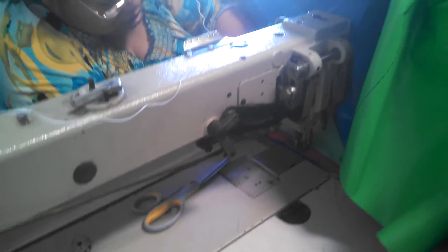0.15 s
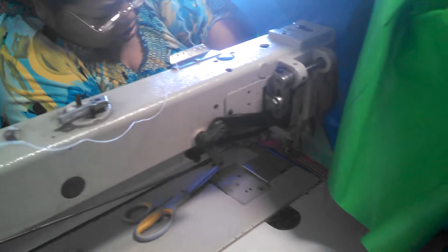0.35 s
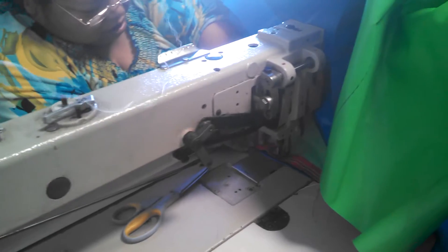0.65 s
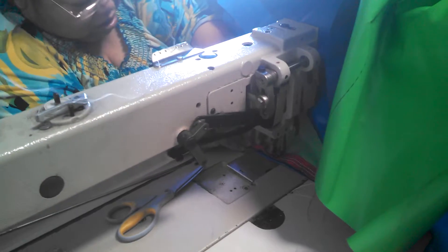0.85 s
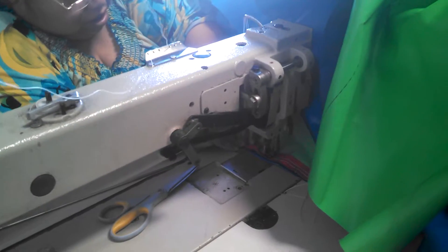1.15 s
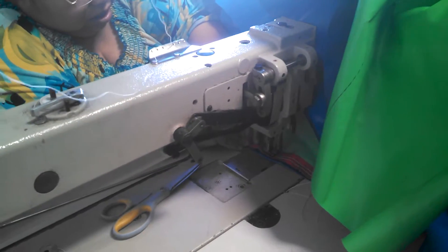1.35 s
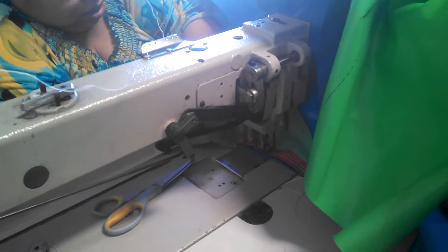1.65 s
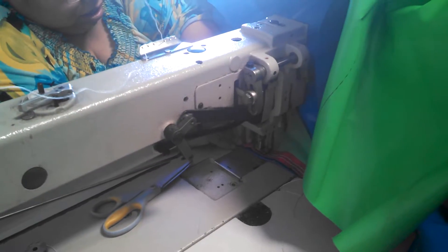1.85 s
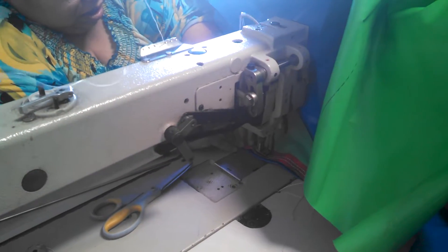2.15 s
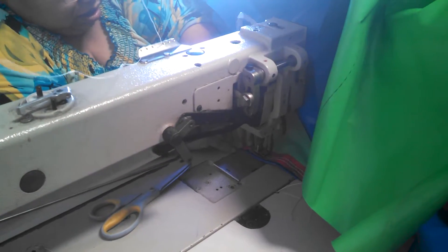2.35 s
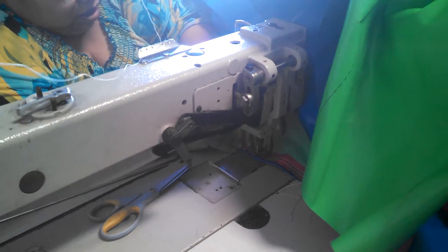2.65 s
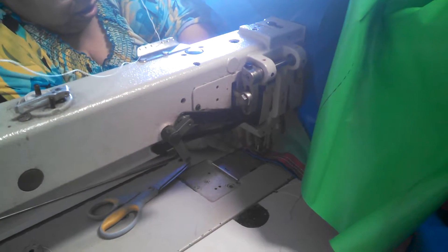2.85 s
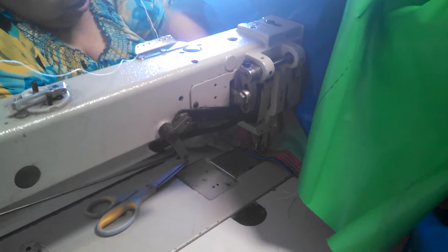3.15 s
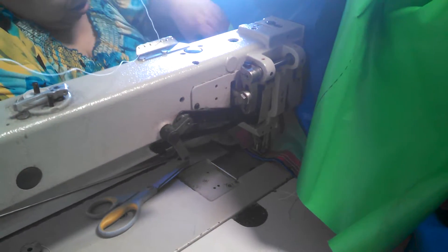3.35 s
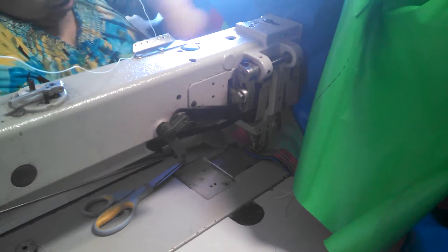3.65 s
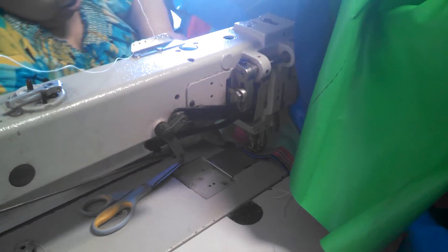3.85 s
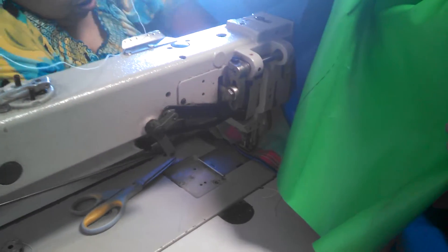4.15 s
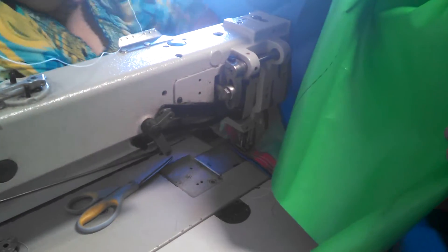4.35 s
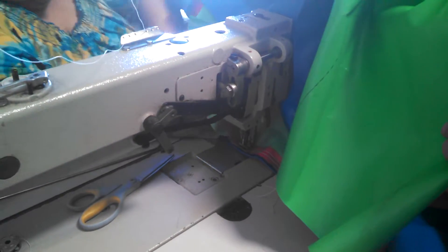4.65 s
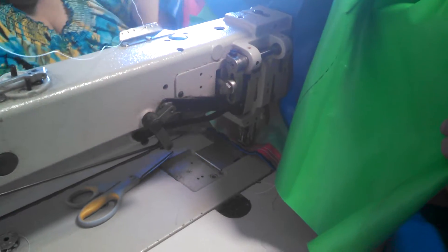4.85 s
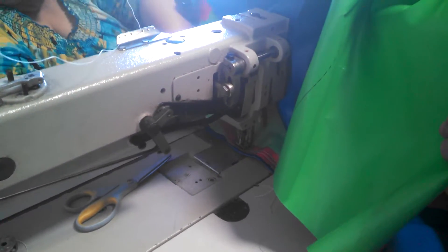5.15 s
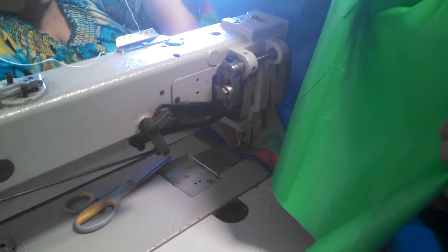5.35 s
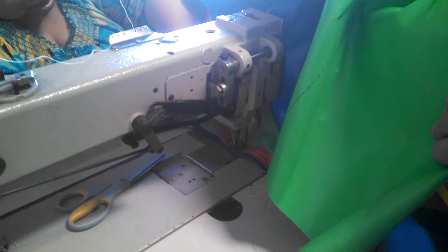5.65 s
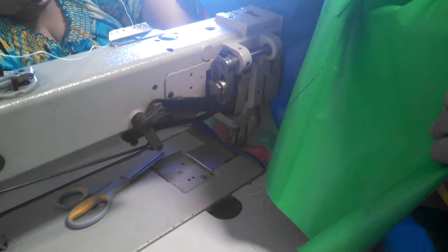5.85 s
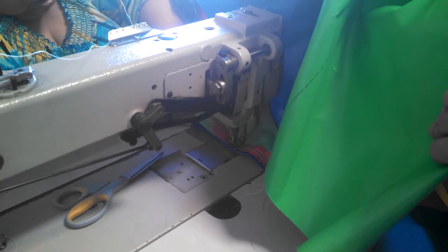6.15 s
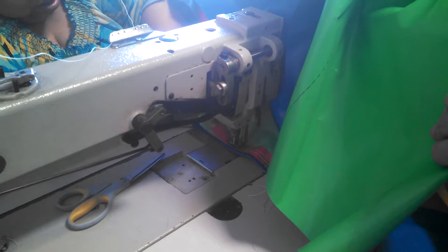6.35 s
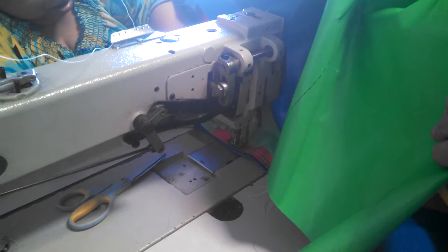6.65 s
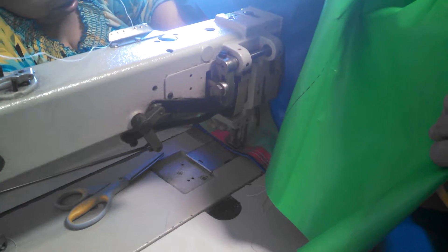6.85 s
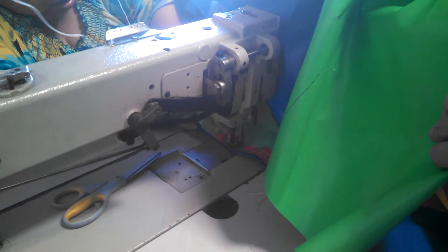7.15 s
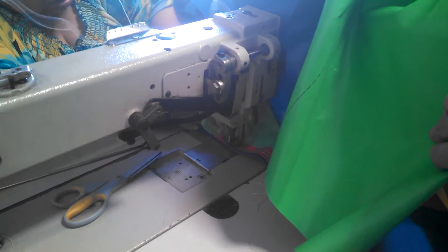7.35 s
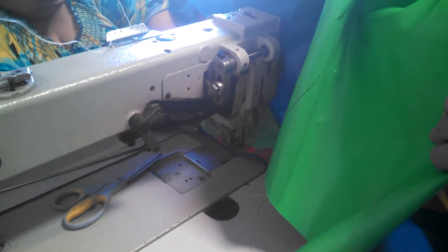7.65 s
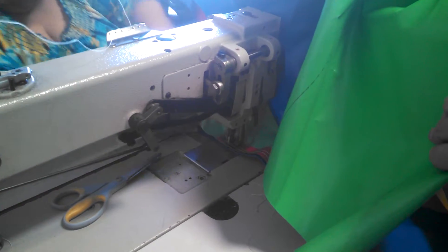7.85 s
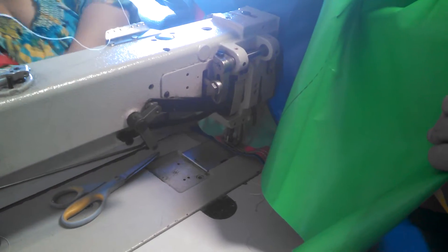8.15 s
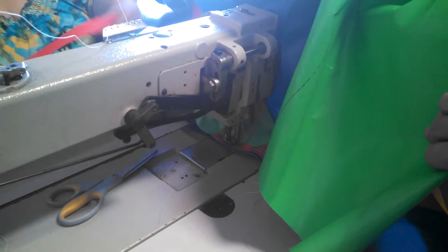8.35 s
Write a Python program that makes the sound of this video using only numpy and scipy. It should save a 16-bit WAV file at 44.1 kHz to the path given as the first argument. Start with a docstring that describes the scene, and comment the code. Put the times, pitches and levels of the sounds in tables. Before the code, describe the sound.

Close stereo sound in a workshop with a short room echo. A mid-pitched motor whine near 520 Hz, with an overtone, sits over low mains hum, airy room wash and a faint, very high whistle. From 0.4 to 0.7 s a heavy sewing machine clatters hard: rapid metal ticks, loose rattling and low table shudder. Shorter bursts follow around 0.8-1.0, 1.25, 1.6-1.8, 2.0, 2.4 and 2.8 s, with small pings. The whine is stronger from about 3 s as stiff vinyl scrapes and crumples; a heavy knock lands at 3.7 s, then dense thumps and rustling from 4.0 to 4.7 s. Sparser crackles and taps fade through 6.5 s, with a crease snap at 6.2. At 6.86-7.15 s a loud burst shakes the table while the whine drops steeply; another comes at 7.3-7.5 s. A light knock at 7.86 s and faint rustle follow as the whine climbs back by 8.5 s.

```python
"""A heavy sewing machine clatters in short bursts: noise strikes, rattle, a ringing head, a shuddering table.
Between bursts stiff vinyl is dragged (filtered grains of noise) and knocked on the table (damped sines).
Behind lie motor whine, mains hum, a thin whistle (sines) and room wash (noise); their level follows a
set curve, falling steeply in the late burst and climbing back. Two spaced ports, the right late and inverted."""
import sys
import numpy as np
from scipy import signal
from scipy.fft import rfft, irfft, next_fast_len
from scipy.io import wavfile
from scipy.ndimage import uniform_filter1d

SR = 44100
rng = np.random.default_rng(int(sys.argv[2]) if len(sys.argv) > 2 else 0)


def master(y):
    """Save y as 16-bit WAV."""
    cut = np.clip(np.atleast_2d(y).T, -1, 1)
    pcm = np.round(cut * 32767)  # scale
    wavfile.write(sys.argv[1], SR, pcm.astype(np.int16))


N = 375291

# Reference level of the steady shop sounds: (time [s], level [dB])
STEADY_LEVEL = [(0, -47.5), (.4, -48), (.75, -50.5), (1.25, -47.5), (1.95, -40), (2.15, -45), (2.95, -36),
                (4.2, -37), (6.86, -36), (6.96, -49), (7.3, -53.5), (7.6, -48.5), (8.5, -39.5)]
# Motor whine partials: (multiple of pitch, level re steady [dB], left above right [dB], left lead [rad])
WHINE_PARTIALS = [(1, -0.5, -0.5, 0.64), (2, -4.5, -3, -0.12), (3, -19, -3.5, 0.67), (4, -39, 0, -2.5),
                  (5, -36, 0, 2), (6, -32, -2, 5.5), (8, -42, -3, 2), (19.283, -33, 0, -7)]
WHINE_HZ = 522.9
MAINS_HZ, MAINS_LEFT_DB, MAINS_RIGHT_DB = 120.3, -1, -8
# Faint hums beside the mains: (frequency [Hz], level re steady [dB])
FAINT_HUMS = [(206, -28), (239.8, -25), (360.3, -22.5), (440, -18.5), (596, -24), (1121, -23)]
# Thin high tone: (time [s], centre frequency [Hz])
WHISTLE_PITCH = [(0, 13495), (1.2, 13505), (2.3, 13528), (2.9, 13517), (3.7, 13530), (3.9, 13548),
                 (4.9, 13512), (5.9, 13540), (6.8, 13568), (7.6, 13560), (8.5, 13538)]
# Room wash spectrum: (frequency [Hz], relative density [dB])
WASH_SPECTRUM = [(30, -13), (70, 1), (150, 3), (400, 3.5), (900, -2), (1800, -8), (2800, -8), (4500, -13.5),
                 (9000, -21), (13300, -24.5), (13900, -61)]
WASH_DB = -7.5  # re steady level
LINGER_DB, LINGER_DB_PER_S = -14, 49  # shop murmur after a burst, re table rumble

# Vinyl dragged over the table: (time [s], hiss level [dB], crumpling level [dB])
VINYL_DRAG = [(2.96, -45, -49), (2.99, -44.5, -39.5), (3.27, -44, -45), (3.35, -42.5, -39.5),
              (3.4, -49, -45), (3.51, -47.5, -44.5), (3.65, -52, -46.5), (3.74, -33, -29.5),
              (3.84, -48, -40.5), (4.02, -40, -35.5), (4.12, -43.5, -32.5), (4.22, -42, -31),
              (4.3, -40, -31.5), (4.35, -42.5, -30.5), (4.39, -51, -39), (4.5, -41.5, -34.5),
              (4.56, -39.5, -34), (4.6, -32.5, -27), (4.64, -42, -35), (4.72, -36.5, -34.5),
              (4.85, -49, -39.5), (4.93, -46.5, -48), (5, -49, -46), (5.06, -46, -43), (5.17, -47.5, -40.5),
              (5.25, -59, -44), (5.42, -45, -43.5), (5.51, -55, -44), (5.57, -44, -42), (5.63, -55, -45),
              (5.7, -55, -36), (5.76, -63, -44), (5.8, -50, -41), (5.98, -69, -48), (6.07, -47, -45),
              (6.12, -58, -49), (6.38, -49, -52), (6.46, -68, -42), (6.51, -52, -39), (6.58, -64, -49),
              (6.73, -49, -51), (6.86, -67, -65), (7.0, -80, -80), (7.7, -60, -50), (7.9, -57.5, -53),
              (8.18, -58.5, -86), (8.3, -47, -50), (8.5, -54, -53)]
# Crumpling spectrum: (frequency [Hz], relative density [dB])
CRUMPLE_SPECTRUM = [(120, -4.5), (250, 4.5), (450, 8), (800, 2), (1300, -3.5), (2500, -50)]
# Stick-slip hiss spectrum: (frequency [Hz], relative density [dB])
SLIDE_SPECTRUM = [(900, -17), (2000, 8), (3200, 3), (4300, 5), (5800, 2), (8000, -1.5), (13100, -6),
                  (13900, -70)]
# Vinyl creases snapping: (time [s], nominal level [dB], note frequency [Hz])
CREASE_SNAPS = [(3.1469, -27, 4440), (3.2277, -29, 4100), (3.342, -28, 4440), (3.7031, -21, 4400),
                (3.7525, -30, 3940), (3.9032, -25, 4200), (4.5322, -28, 3870), (4.65, -28, 4050),
                (4.6902, -25, 4100), (4.8231, -32, 3810), (5.4048, -33, 4430), (5.5638, -36, 3950),
                (5.7894, -32, 4270), (6.0694, -46, 4250), (6.2066, -22.5, 3860)]
SNAP_RISE_S, SNAP_T60_S, SNAP_HISS_DB, SNAP_NOTE_DB = 0.0035, 0.044, -14, -14.5

# Thin parts left ringing: (time [s], level [dB], frequency [Hz], t60 [s])
PINGS = [(0.876, -31, 3850, 0.037), (1.02, -31, 2680, 0.15), (1.225, -41, 12500, 0.11),
         (1.255, -18, 7820, 0.017), (1.617, -17, 7800, 0.019), (2.023, -18, 7850, 0.026),
         (.512, -21, 1770, 0.045), (2.784, -25, 1980, .04), (2.965, -23.5, 1910, 0.035),
         (2.98, -27, 2100, .025), (6.401, -38, 4480, 0.088), (6.403, -28, 5400, 0.061),
         (1.279, -27, 4600, 0.022), (6.89, -32, 6900, 0.023), (7.3, -27, 7650, 0.026),
         (7.39, -27, 7500, 0.027), (7.416, -25, 7800, .03), (7.437, -39, 9560, 0.089),
         (7.463, -31, 3800, .04), (2.268, -45, 6700, 0.032), (7.51, -30, 2600, 0.06)]
# Blows on the table: (time [s], nominal level [dB], pitch [Hz], rise [swings], t60 [s])
TABLE_BLOWS = [(0.425, -14, 220, .8, .015), (.468, -17, 590, 1.5, 0.029), (.487, -16, 590, 1.2, 0.03),
               (.511, -17, 770, 1.4, 0.033), (.521, -17, 320, 1, 0.018), (.556, -21, 766, 1.5, .02),
               (.577, -18, 674, 1.5, .02), (.855, -27, 616, 1.2, .025), (.952, -21.5, 630, 1.6, 0.028),
               (.978, -23, 304, 1.2, 0.023), (1.002, -20, 703, 1.6, 0.023), (1.026, -21, 517, 1.4, .025),
               (1.266, -7, 350, 0.72, 0.0084), (1.602, -24, 595, 2.2, 0.036), (1.621, -25, 1150, 2.4, 0.03),
               (1.645, -17.5, 242, 1.3, 0.038), (1.704, -22, 483, 1.7, 0.027),
               (1.772, -19.5, 785, 1.1, 0.018), (1.971, -22, 530, 1.5, 0.019),
               (2.045, -18, 250, 1.2, 0.033), (2.105, -24, 525, 1.3, 0.025), (2.022, -11, 634, 0.8, 0.01),
               (2.374, -20.5, 605, 1, 0.036), (2.414, -21.5, 743, 1.5, 0.027),
               (2.784, -24, 1150, 2.2, 0.023), (2.806, -23, 1140, 2, .025), (2.966, -14.5, 555, 2.2, 0.019),
               (3.707, -2, 660, 2.1, 0.014), (3.977, -36, 500, 1.7, 0.015), (4.017, -19, 474, 1.2, 0.027),
               (4.188, -17, 406, 1.6, 0.027), (4.208, -17, 640, 1.6, 0.022), (4.236, -16, 486, 2, 0.037),
               (4.279, -16, 870, 0.54, 0.026), (4.304, -20, 783, 1.7, 0.041), (4.323, -14, 590, 1.5, 0.016),
               (4.346, -7.5, 590, 0.78, 0.015), (4.391, -18.5, 800, 1.3, 0.027),
               (4.534, -12.5, 660, 2, 0.023), (4.584, -12, 625, 1.1, 0.018), (4.616, -31, 570, 1.8, 0.027),
               (4.719, -27, 660, 1.6, .02), (5.05, -19.5, 388, 1.5, 0.021), (5.274, -18.5, 705, 1.6, 0.019),
               (5.69, -19, 700, 1.8, 0.02), (5.789, -29, 594, 1.2, 0.026), (5.843, -20, 695, 0.87, 0.0098),
               (6.203, -21.5, 720, 1.5, 0.019), (6.499, -26, 680, 1.1, 0.015), (6.87, -16.5, 272, 1.2, .03),
               (6.904, -3, 400, 0.87, 0.012), (6.929, -12, 706, .6, 0.017), (6.984, -32, 845, 0.95, 0.016),
               (7.03, -31, 910, 1.2, 0.017), (7.087, -22, 781, 1.5, .025), (7.297, -30, 780, 1.9, 0.046),
               (7.333, -25, 310, 1.2, 0.024), (7.414, -23, 720, 1.6, 0.028), (7.445, -15, 308, 1.2, 0.023),
               (7.466, -11, 325, 1.3, 0.03), (7.492, -25, 782, 1.4, 0.065), (7.859, -21.5, 660, 1.8, 0.012)]

# Pedal pushes: (start [s], rise [s], hold [s], table rumble [dB], rattle of loose parts [dB])
PEDAL_BURSTS = [(0.379, 0.077, 0.14, -28.5, -36), (0.777, 0.095, 0.012, -35.5, -42),
                (0.935, 0.022, 0.028, -35.5, -45), (1.224, 0.05, 0.016, -30.5, -43),
                (1.559, 0.069, 0.025, -30.5, -41.5), (1.69, 0.14, .01, -49, -51.5),
                (1.952, 0.065, 0.018, -29.5, -39.5), (2.156, 0.033, 0.0092, -44.5, -74),
                (2.357, 0.032, 0.051, -34, -64), (2.763, 0.027, 0.18, -36.5, -66),
                (6.858, 0.032, 0.17, -27, -32), (7.276, 0.069, 0.017, -36, -38.5),
                (7.393, 0.043, 0.0081, -29, -49)]
START_S, RISE_DB = 0.014, 10.5  # onset ramp; a burst starts this far under its top
RUMBLE_FALL_DB_PER_S, RATTLE_FALL_DB_PER_S = 139, 127
# Table shudder spectrum: (frequency [Hz], relative density [dB])
SHUDDER_SPECTRUM = [(100, -10), (170, 3), (250, 5), (500, 2.5), (750, -0.5), (1250, -7.5), (2200, -21.5),
                    (4000, -28.5)]
# Jolts that set the table swaying: (time [s], level [dB])
TABLE_JOLTS = [(.41, -28.5), (.475, -36), (.635, -47), (.8, -39), (.87, -42), (.965, -30), (1.26, -27),
               (1.62, -28), (1.76, -62), (2.015, -28), (2.21, -53), (2.39, -31.5), (2.79, -42), (2.85, -38),
               (2.98, -52), (6.89, -22.5), (7.03, -37), (7.1, -48), (7.22, -53), (7.315, -34),
               (7.435, -23.5)]
JOLT_RISE_S, JOLT_T60_S, JOLT_TAIL_DB, JOLT_TAIL_T60_S = 0.011, 0.27, -10.5, 1
STILL_S, STILL_DB_PER_S = 7.485, 200  # the brake damps the swaying after the last burst
SWAY_HZ = 89.9
# Noise of the swaying: (frequency [Hz], relative density [dB])
SWAY_SPECTRUM = [(40, 9), (60, -2.5), (90, 17), (130, -1), (200, -41)]

# Metal strikes: (time [s], nominal level [dB], head ring re strike [dB], brightness re strike [dB], t60 [s])
METAL_STRIKES = [(0.396, -30.5, 8, -22, 0.15), (0.444, -27, -1, -10, 0.095), (0.4628, -14.5, -3, -18, 0.09),
                 (.478, -21, -1, -9, .06), (0.488, -28, 8, -7, .05), (0.5012, -23, 3, -9, .06),
                 (0.5128, -15.5, -1, -12.5, 0.057), (0.522, -21, -7, -11, 0.045),
                 (0.543, -21.5, -20, -15, 0.21), (0.568, -24.5, -26, -10, 0.12),
                 (0.608, -15, -7, -18, 0.044), (0.622, -27, -12, -6, 0.038), (.641, -32, -12, -10, .07),
                 (.667, -32, -6, -18, 0.042), (.69, -36, 7, -23, 0.044), (.797, -42, 10, -26, 0.065),
                 (0.816, -27, -9, -17, 0.039), (0.853, -12.5, -16, -13.5, 0.029),
                 (.8754, -33, -16, -14, 0.053), (.902, -25.5, -19, -12, .04), (.918, -29, -18, -12, .04),
                 (.931, -25, -20, -17, 0.044), (.949, -21, -4, -13, 0.064), (.9944, -29.5, -8, -23, 0.12),
                 (1.042, -45, 15.5, -26, .07), (1.253, -23.5, -25, -11.5, 0.039),
                 (1.277, -27.5, -27, -31, 0.08), (1.342, -28.5, -3, -15.5, 0.049),
                 (1.359, -42, -10, -16, 0.041), (1.398, -35.5, -13, -12, 0.053), (1.562, -35, 5, -18, .08),
                 (1.5713, -29.5, 3, -12.5, 0.091), (1.6146, -21.5, -1, -12, 0.037),
                 (1.64, -24, -26, -13, 0.078), (1.695, -29.5, 7, -11, 0.064),
                 (1.7447, -26.5, -26, -12, 0.038), (1.772, -27, 1, -19, 0.026),
                 (1.783, -41, -15, -8, 0.022), (1.966, -23, 0, -22, .06), (1.973, -25, 0, -16, 0.078),
                 (2.02, -18, 2, -11, 0.046), (2.046, -23.5, -25, -17, 0.057), (2.096, -32, 7.5, -9, 0.073),
                 (2.143, -27.5, -22, -13.5, 0.083), (2.203, -28, 0, -17, 0.032),
                 (2.364, -27.5, -2, -20, 0.16), (2.3886, -31, -1, -19, 0.077),
                 (2.4148, -26, 4.5, -11, 0.097), (2.445, -23, -7, -24, 0.029), (2.783, -29, 6, -14, 0.088),
                 (2.803, -25, -9, -27, 0.061), (2.835, -26, 1.5, -13.5, 0.16), (2.867, -30, 5, -20, .07),
                 (2.963, -24.5, -9, -8.5, 0.12), (3.1918, -39, 14.5, -18, 0.076), (4.342, -32, 9, -31, .06),
                 (6.399, -26, -27, -6, 0.03), (6.8665, -27, -9, -30, 0.057), (6.889, -18.5, -23, -14, 0.06),
                 (6.915, -14, -3, -13, 0.039), (6.927, -18, -12, -20, .05), (6.939, -11.5, -26, -13, 0.047),
                 (6.966, -20, -18, -10, 0.079), (6.981, -16.5, 3, -16, 0.063), (6.992, -21, -16, -10, 0.15),
                 (7.029, -23, 2, -14, 0.054), (7.04, -18, -3, -15, 0.061), (7.066, -28, -4, -7, .06),
                 (7.085, -14.5, 0, -17, .05), (7.098, -24, -8, -7, 0.038), (7.124, -40, -12, -5, 0.052),
                 (7.148, -39, -8, -16, 0.053), (7.183, -33.5, 2, -12, 0.059), (7.297, -28.5, -2, -11, 0.04),
                 (7.3236, -30, -13, -12, 0.065), (7.3577, -29, -14, -13, 0.066),
                 (7.3866, -20.5, -7, -12, 0.041), (7.413, -20, 1.5, -15, 0.039),
                 (7.4335, -24, -17, -15, 0.097), (7.46, -25, -16, -22, 0.064),
                 (7.487, -29.5, 9, -12, 0.042)]
STRIKE_RISE_S, BRIGHT_T60_S, CLINK_DB, CLINK_T60_S = 0.0039, 0.36, -7, 0.019
# Rattle of loose steel: (frequency [Hz], relative density [dB])
RATTLE_SPECTRUM = [(1500, -8), (3000, 0.5), (4200, -7.5), (6500, -10), (10000, -9), (14800, -25),
                   (15600, -55)]
# Machine head modes: (frequency [Hz], t60 [s], relative level [dB])
HEAD_MODES = [(1230, .02, -2), (1420, .018, -4), (1570, .02, -4), (1800, .03, -2), (2010, .022, -2),
              (2300, .018, -3), (2480, .018, -2), (2650, .018, -2), (3050, .018, -3)]
# Small-part resonances: (frequency [Hz], width [Hz], gain [dB])
PART_PEAKS = [(3550, 30, -19), (3900, 91, 3.5), (4280, 220, 2.5), (5150, 2050, 9), (8060, 470, 8),
              (10540, 220, 6)]
# Lower half of a tick: (frequency [Hz], relative density [dB])
DULL_SPECTRUM = [(1500, -2.5), (3000, 3.5), (4200, -1.5), (6000, -2), (8000, -31)]
# Upper half of a tick: (frequency [Hz], relative density [dB])
BRIGHT_SPECTRUM = [(4500, -33), (6500, 4), (8000, 9), (11000, 10), (14800, 7), (15600, -23)]
# What the shop throws back: (frequency [Hz], relative density [dB])
ECHO_SPECTRUM = [(300, -36), (1000, 12.5), (2200, 11.5), (5000, 1), (10000, 5)]

# Microphone ports: (frequency [Hz], left-right likeness [0-1])
PORT_LIKENESS = [(60, .45), (130, .5), (200, .65), (400, .5), (600, .85), (1000, .9), (1250, .95),
                 (1400, 1)]
# Port tilt: (frequency [Hz], left above right [dB])
PORT_TILT = [(60, 12), (110, 9), (170, 4), (260, 6.5), (400, 6), (550, 2.5), (1200, -.5), (2000, -1),
             (2600, 0)]
# Port phase: (frequency [Hz], extra lead of the left [rad])
PORT_LEAD = [(40, 0.12), (120, 2), (170, 2.4), (250, 3.5), (390, 5.9), (520, 7.17), (1046, 6.5),
             (1400, 2 * np.pi)]
# Tie of the ports' sum and difference: (frequency [Hz], likeness [0-1])
SUM_DIFF_LIKENESS = [(700, 1), (1100, .85), (1500, .45), (2200, .45), (3300, .6), (5000, .7), (7000, .55),
                     (9000, .3), (13000, .3)]
LAG_SAMPLES, EDGE_HZ = 16, 15700


def gain_of(db):
    """Amplitude ratio of a level in dB."""
    return 10 ** (np.asarray(db) / 20)


def evened(x):
    """Scales to rms 1."""
    return x / np.sqrt(np.mean(x ** 2) + 1e-20)


def read(points, hz):
    """Curve over frequency, interpolated on a log axis."""
    f, value = np.transpose(points)
    return np.interp(np.log(hz + 1), np.log(f + 1), value)


def played(rows):
    """Columns of a time curve at every sample."""
    s, *columns = np.transpose(rows)
    return [np.interp(np.arange(N) / SR, s, c) for c in columns]


def split(left_above_right_db):
    """Left and right gains of a level difference."""
    return gain_of(left_above_right_db * np.array([[.5], [-.5]]))


def coloured(x, points, peaks=()):
    """Minimum-phase filter from a spectrum plus resonances; white noise of rms 1 keeps rms 1."""
    hz = np.fft.rfftfreq(4096, 1 / SR)
    db = read(points, hz) + sum(d / (1 + (2 * (hz - f) / w) ** 2) for f, w, d in peaks)
    log_gain = np.log(gain_of(np.r_[db, db[-2:0:-1]]))
    taps = np.fft.ifft(np.exp(np.conj(signal.hilbert(log_gain)))).real  # causal: rings only after the blow
    return signal.oaconvolve(x, taps[None] / np.linalg.norm(taps), axes=1)[:, :N]


def noise():
    """White noise, unrelated in two channels."""
    return rng.standard_normal((2, N))


def waver(per_s):
    """Slow chance, rms 1."""
    width = int(SR / per_s)
    return evened(uniform_filter1d(uniform_filter1d(rng.standard_normal(N), width), width))


def grains(per_s, spread_db, t60_s):
    """Noise in short dying puffs of uneven size, rms 1."""
    size = gain_of(spread_db * np.minimum(rng.exponential(1, N), 4))
    hits = size * (rng.random(N) < per_s / SR)
    return evened(signal.lfilter([1], [1, -gain_of(-60 / t60_s / SR)], hits) * noise())


def patchy(x, patch_db):
    """Louder and softer patches drift over time and pitch."""
    z = signal.stft(x, nperseg=512)[2]
    chance = rng.standard_normal(z.shape[:0:-1])
    patches = evened(uniform_filter1d(uniform_filter1d(chance, size=9, axis=0), size=9, axis=1))
    return signal.istft(z * gain_of(patch_db * patches.T), nperseg=512)[1][:, :N]


def envelope(column, fall_db_per_s):
    """Gain that jumps up, rises, holds and dies with each burst, at the level in one column."""
    t, total = np.arange(N) / SR, np.zeros(N)
    for burst in PEDAL_BURSTS:
        start_s, rise_s, hold_s = burst[:3]
        rise = RISE_DB * np.clip(1 - (t - start_s) / rise_s, 0, 1)
        fall = fall_db_per_s * np.maximum(t - (start_s + rise_s + hold_s), 0)
        total += np.clip((t - start_s) / START_S, 0, 1) * gain_of(burst[column] - rise - fall)
    return total


def shop():
    """Room wash is filtered grains; whine, hum and whistle are sines with their own left-right phase."""
    level, t = gain_of(played(STEADY_LEVEL)[0]), np.arange(N) / SR
    tones = np.zeros((2, N))
    for multiple, db, left_db, lead_rad in WHINE_PARTIALS:
        amplitude = gain_of(db + 2.0 * waver(3.2)) * split(left_db)
        phase = 2 * np.pi * multiple * WHINE_HZ * t + 0.022 * waver(11.0)
        tones += amplitude * np.sin(phase + [[lead_rad], [0]])
    for hz, db in FAINT_HUMS:
        phase = 2 * np.pi * np.cumsum(hz + 2.62 * waver(6.48)) / SR
        tones += gain_of(db) * split(read(PORT_TILT, hz)) * np.sin(phase)
    mains_gain = gain_of([[MAINS_LEFT_DB], [MAINS_RIGHT_DB]]) * gain_of(0.96 * waver(3.6))
    tones += mains_gain * np.sin(2 * np.pi * MAINS_HZ * t + [[0], [1.7]])
    whistle_phase = 2 * np.pi * np.cumsum(played(WHISTLE_PITCH)[0] + 6 * waver(8.7)) / SR
    tones += gain_of([[-9], [-8]]) * np.sin(whistle_phase + [[0], [2.5]])
    murmur = gain_of(LINGER_DB) * envelope(column=3, fall_db_per_s=LINGER_DB_PER_S)
    wash = coloured(grains(per_s=1500, spread_db=1.0, t60_s=0.032), WASH_SPECTRUM)
    wash = gain_of(2.0 * waver(19.0)) * patchy(wash, patch_db=1.0)
    return (gain_of(WASH_DB) * level + murmur) * wash, np.sqrt(2) * level * tones


def snaps():
    """Creases snap: short puffs of hiss, each with a decaying note."""
    t = np.arange(SR // 10) / SR
    puffs, notes = np.zeros((2, N + len(t)))
    for s, db, hz in CREASE_SNAPS:
        here = slice(round(s * SR), round(s * SR) + len(t))
        fall = gain_of(db - 60 * t / SNAP_T60_S) * np.minimum(t / SNAP_RISE_S, 1)
        puffs[here] += fall
        notes[here] += fall * np.sin(2 * np.pi * hz * t)
    hiss = coloured(puffs[:N] * noise(), SLIDE_SPECTRUM)
    return gain_of(SNAP_HISS_DB) * hiss + gain_of(SNAP_NOTE_DB) * notes[:N]


def vinyl():
    """Fine stick-slip hiss, duller crumpling and snapping creases of the stiff sheet."""
    slips = grains(per_s=900, spread_db=2.8, t60_s=.03)
    folds = grains(per_s=600, spread_db=1.7, t60_s=.045)
    hiss, crumple = gain_of(played(VINYL_DRAG)) * (np.arange(N) / SR > VINYL_DRAG[0][0])
    hiss = hiss * gain_of(1.35 * waver(24.0))
    return hiss * coloured(slips, SLIDE_SPECTRUM) + crumple * coloured(folds, CRUMPLE_SPECTRUM) + snaps()


def knocks():
    """Damped swings with partials above and below; they reach both ports together through the table."""
    t = np.arange(SR // 2) / SR
    out = np.zeros((2, N + len(t)))
    for s, db, hz, swings, t60_s in TABLE_BLOWS:
        swing = np.sin(2 * np.pi * hz * t)
        swing += .5 * np.sin(2 * np.pi * 1.73 * hz * t) * gain_of(-60 * t / 0.022)
        swing += 0.5 * np.sin(2 * np.pi * 0.527 * hz * t)  # the board bends under the blow
        slap = uniform_filter1d(uniform_filter1d(rng.standard_normal(len(t)), size=24), size=16)
        swing += 0.22 * slap  # contact
        fall = gain_of(db - 60 * t / t60_s) * np.minimum(t * hz / swings, 1)
        out[:, round(s * SR):][:, :len(t)] += split(read(PORT_TILT, hz)) * fall * swing
    return out[:, :N]


def ping():
    """Single thin parts ring out as decaying sines."""
    t = np.arange(SR // 4) / SR
    out = np.zeros(N + len(t))
    for s, db, hz, t60_s in PINGS:
        fall = gain_of(db - 60 * t / t60_s) * np.clip(t / 0.0011, 0, 1)
        out[round(s * SR):][:len(t)] += fall * np.sin(2 * np.pi * hz * t)
    return out[:N]


def rumble():
    """The table shudders under the running machine and sways on its lowest mode after each jolt."""
    t, sway = np.arange(N) / SR, np.zeros(N)
    still_db = STILL_DB_PER_S * np.maximum(t - STILL_S, 0)
    for s, db in TABLE_JOLTS:
        age = abs(t - s)
        fall = gain_of(-60 * age / JOLT_T60_S - still_db) + gain_of(JOLT_TAIL_DB - 60 * age / JOLT_TAIL_T60_S)
        sway += np.clip((t - s) / JOLT_RISE_S, 0, 1) * gain_of(db) * fall
    mode = np.sin(2 * np.pi * np.cumsum(SWAY_HZ + 7 * waver(20.66)) / SR + [[0], [2.4]])
    shudder = coloured(grains(per_s=900, spread_db=1.2, t60_s=.03), SHUDDER_SPECTRUM)
    running = envelope(column=3, fall_db_per_s=RUMBLE_FALL_DB_PER_S)
    return running * shudder + sway * (mode + 0.27 * coloured(noise(), SWAY_SPECTRUM))


def machine():
    """Loose parts rattle while the shaft turns; each hard strike chatters and rings the machine head."""
    t = np.arange(SR // 4) / SR
    dull, bright, blows, clinks = np.zeros((4, N + len(t)))
    pitches_hz = 3000 * 3.3 ** rng.random((len(METAL_STRIKES), 3, 1))  # three clinks per strike
    for (s, db, ring_db, top_db, t60_s), clink_hz in zip(METAL_STRIKES, pitches_hz):
        here = slice(round(s * SR), round(s * SR) + len(t))
        ramp = np.minimum(t / STRIKE_RISE_S, 1)
        clink = np.sin(2 * np.pi * clink_hz * t).sum(axis=0)
        clinks[here] += gain_of(db + CLINK_DB - 60 * t / CLINK_T60_S) * ramp * clink
        fall = gain_of(db - 60 * t / t60_s) * np.sin(np.pi / 2 * ramp) ** 2
        dull[here] += fall
        bright[here] += gain_of(top_db - 60 * t / BRIGHT_T60_S) * fall  # the top dies sooner
        blows[here] += gain_of(ring_db - 2.0 - 60 * t / 0.16) * fall
    modes = sum(gain_of(db - 60 * t / t60_s) * np.sin(2 * np.pi * hz * t) for hz, t60_s, db in HEAD_MODES)
    ring = signal.oaconvolve(blows[:N] * noise(), modes[None] / np.linalg.norm(modes), axes=1)[:, :N]
    loose = grains(per_s=350, spread_db=3, t60_s=.025)
    chatter = evened(grains(per_s=1600, spread_db=2.8, t60_s=.005) + noise())
    ticks = gain_of(-5.0) * coloured(dull[:N] * chatter, DULL_SPECTRUM, PART_PEAKS)
    ticks += gain_of(7.0) * coloured(bright[:N] * chatter, BRIGHT_SPECTRUM, PART_PEAKS)
    running = envelope(column=4, fall_db_per_s=RATTLE_FALL_DB_PER_S)
    direct = coloured(running * loose, RATTLE_SPECTRUM, PART_PEAKS) + ticks + ring + clinks[:N]
    # the narrow ring of the head is mostly lost on the way to the walls
    to_walls = (direct - 0.59 * ring)[:1]
    tail = rng.standard_normal((2, SR)) * gain_of(-60 * np.arange(SR) / SR / 0.33)
    echo = signal.oaconvolve(to_walls, tail / np.linalg.norm(tail[0]), axes=1)[:, :N]
    return direct + gain_of(-6.5) * coloured(echo, ECHO_SPECTRUM)


def scene():
    """Shared and unrelated parts reach two spaced ports, the right late and inverted.
    Sum and difference keep their comb notches, but in the treble they drift apart."""
    wash, tones = shop()
    size = next_fast_len(N + 4096)
    shared, other = rfft(wash + vinyl() + ping() + rumble() + machine(), size)
    hz = np.fft.rfftfreq(size, 1 / SR)
    same, tied = np.clip(read(PORT_LIKENESS, hz), 0, 1), np.clip(read(SUM_DIFF_LIKENESS, hz), 0, 1)
    tilt = gain_of(read(PORT_TILT, hz) / 2)
    late = -np.exp(-1j * (2 * np.pi * hz * LAG_SAMPLES / SR + read(PORT_LEAD, hz)))
    right = (same * shared + np.sqrt(1 - same ** 2) * other) * late
    mid = shared + right
    side = tied * (shared - right) + np.sqrt(1 - tied ** 2) * other * (1 - late)
    ports = [(mid + side) / 2 * tilt, (mid - side) / 2 / tilt]
    return irfft(np.array(ports), size)[:, :N] + tones + knocks()


def record(dry):
    """The microphones lose the deepest bass; then the band limit."""
    thin = signal.sosfilt(signal.butter(3, 50, "high", fs=SR, output="sos"), dry)
    low_pass = signal.firwin(511, EDGE_HZ, window=("kaiser", 9), fs=SR)
    return signal.oaconvolve(thin, low_pass[None], "same")


dry = scene()
out = record(dry)
master(out)
```